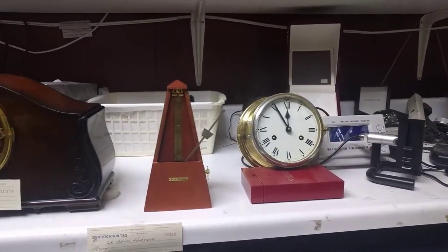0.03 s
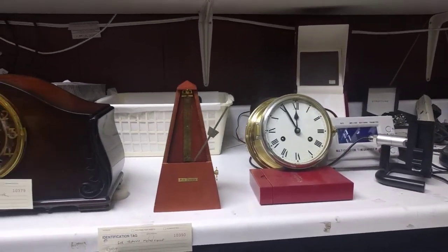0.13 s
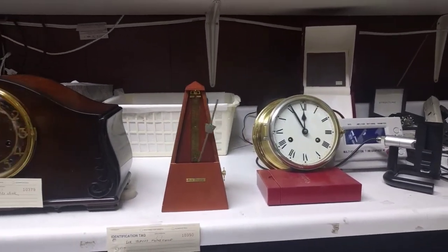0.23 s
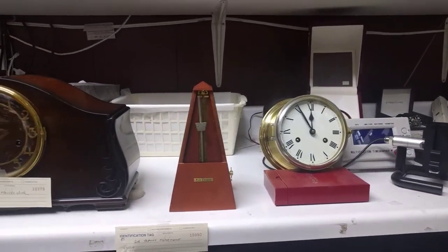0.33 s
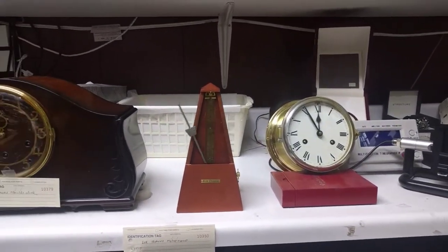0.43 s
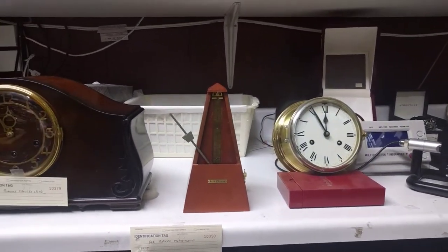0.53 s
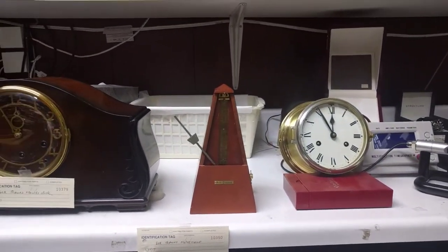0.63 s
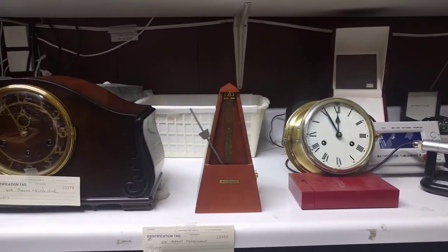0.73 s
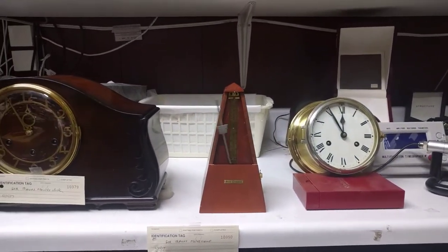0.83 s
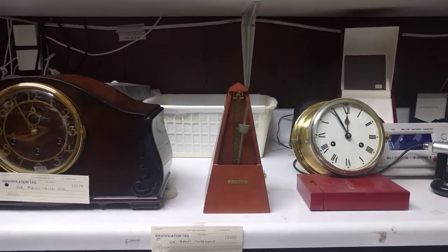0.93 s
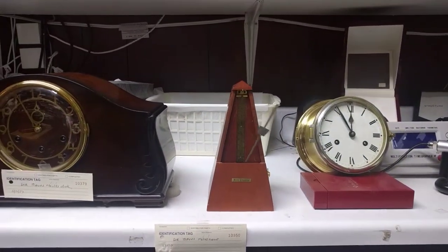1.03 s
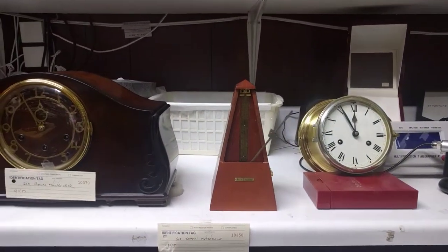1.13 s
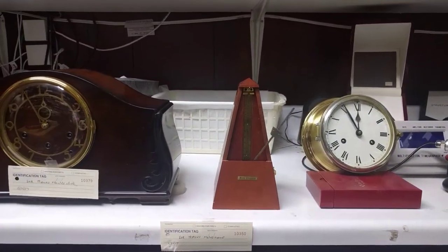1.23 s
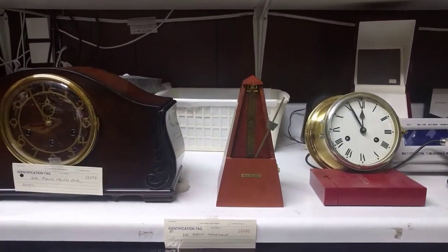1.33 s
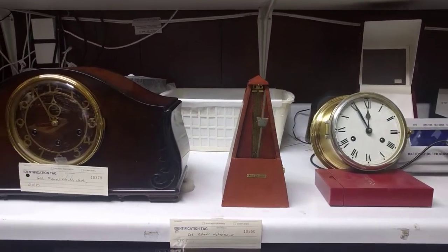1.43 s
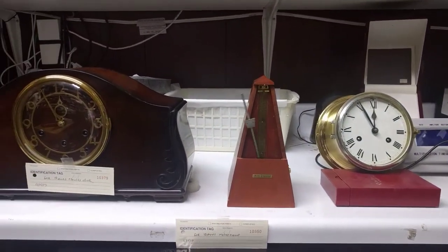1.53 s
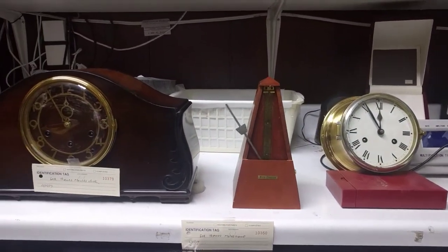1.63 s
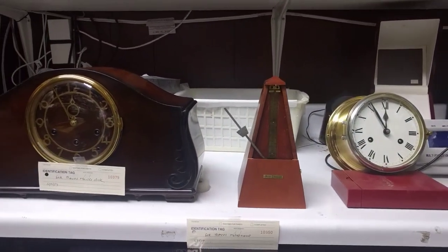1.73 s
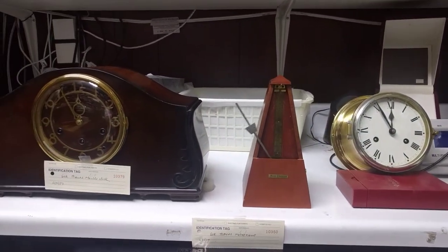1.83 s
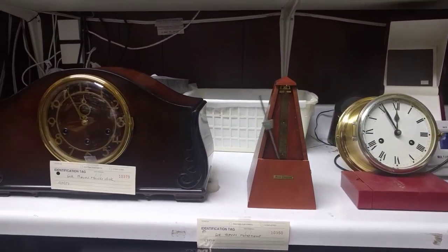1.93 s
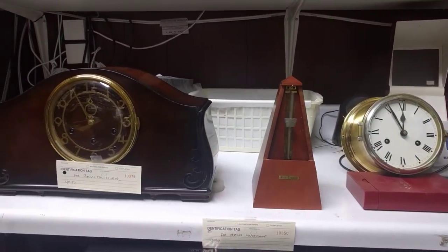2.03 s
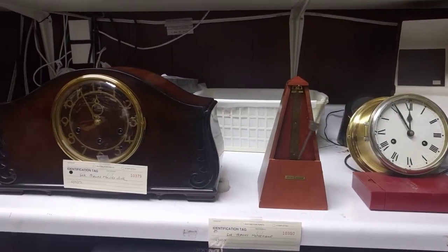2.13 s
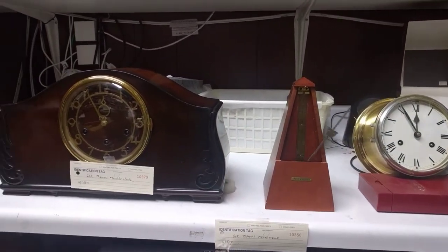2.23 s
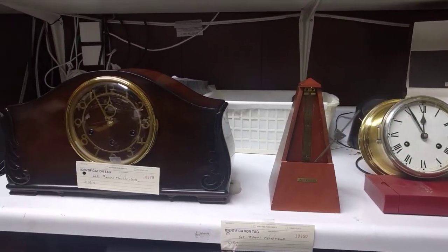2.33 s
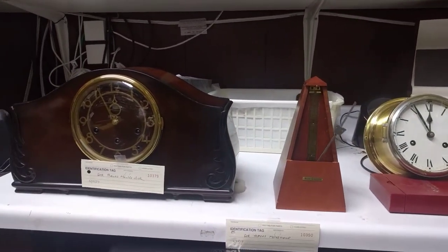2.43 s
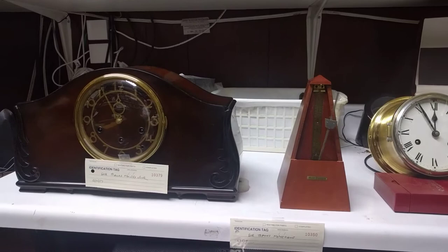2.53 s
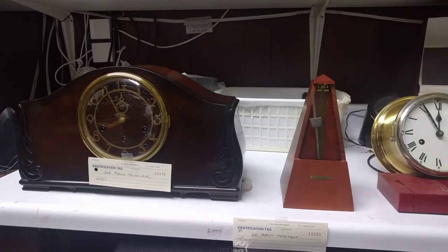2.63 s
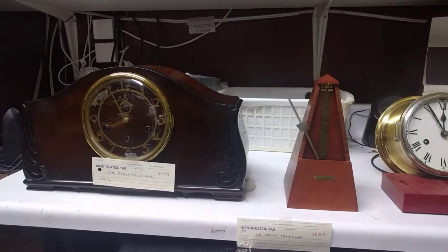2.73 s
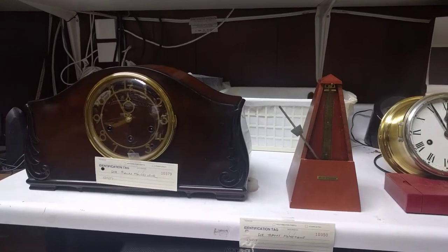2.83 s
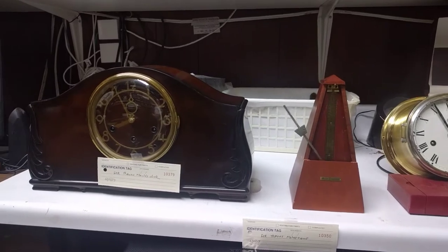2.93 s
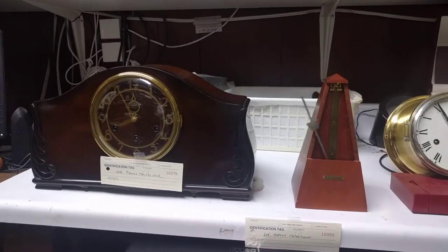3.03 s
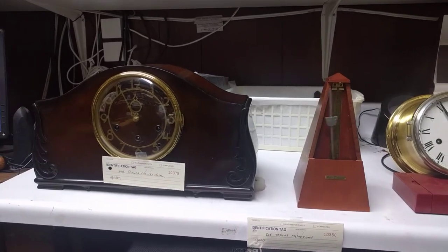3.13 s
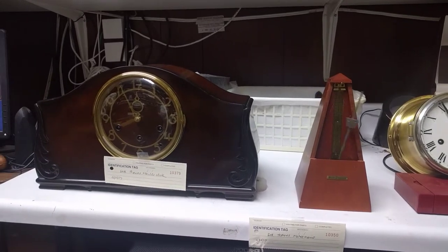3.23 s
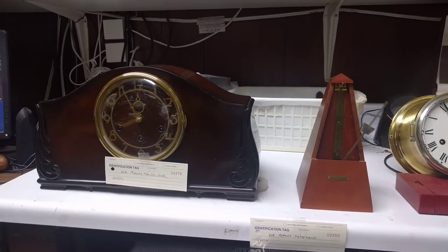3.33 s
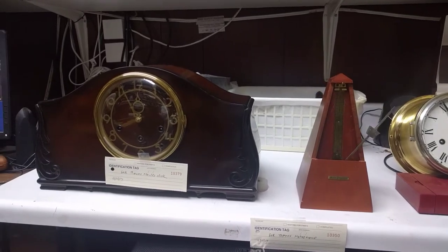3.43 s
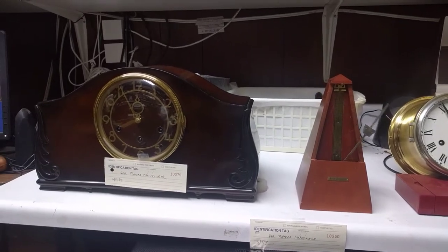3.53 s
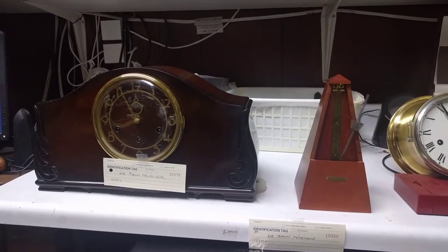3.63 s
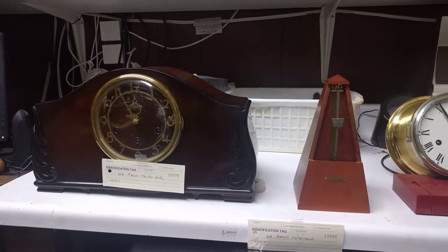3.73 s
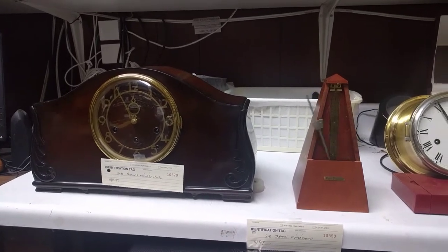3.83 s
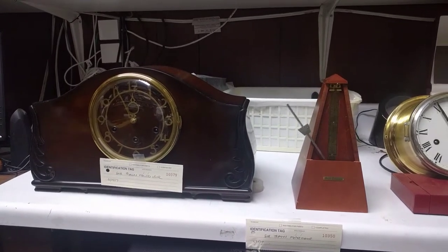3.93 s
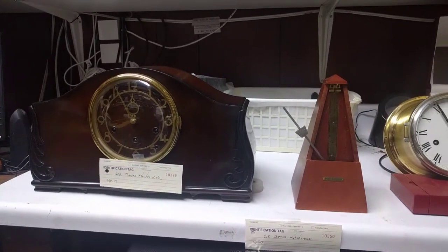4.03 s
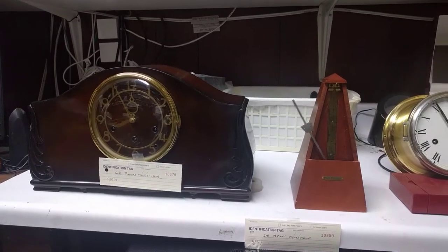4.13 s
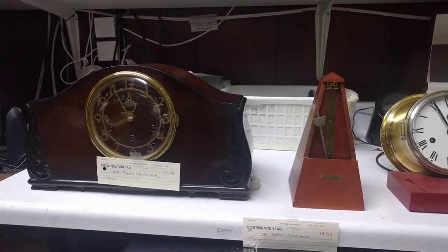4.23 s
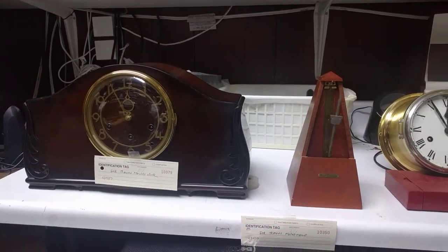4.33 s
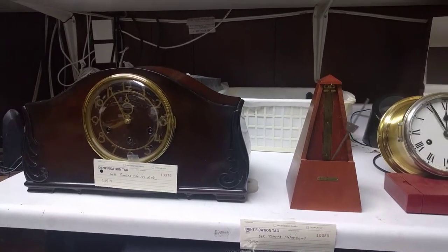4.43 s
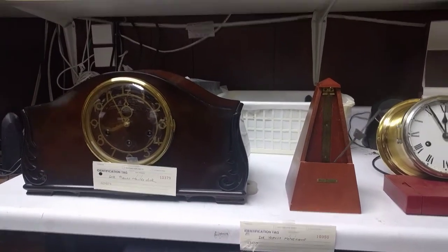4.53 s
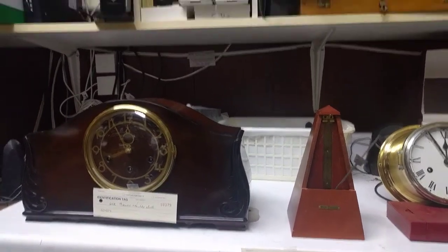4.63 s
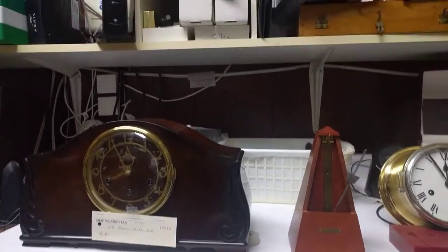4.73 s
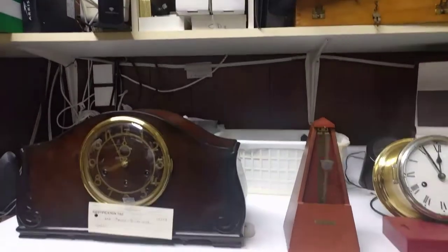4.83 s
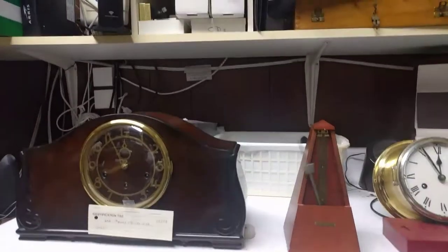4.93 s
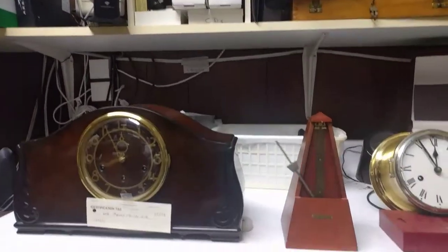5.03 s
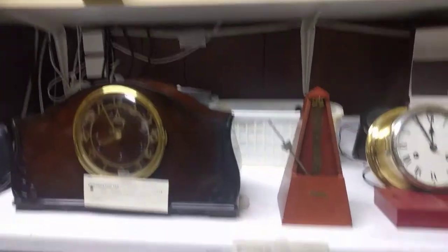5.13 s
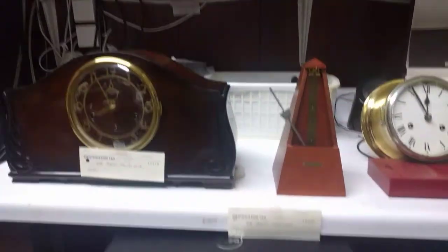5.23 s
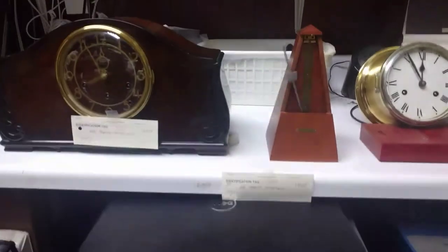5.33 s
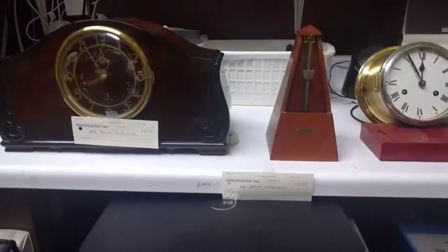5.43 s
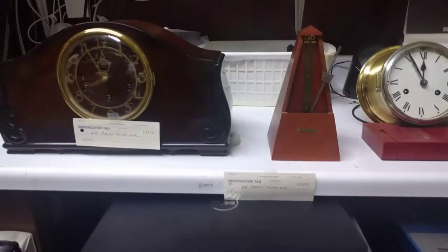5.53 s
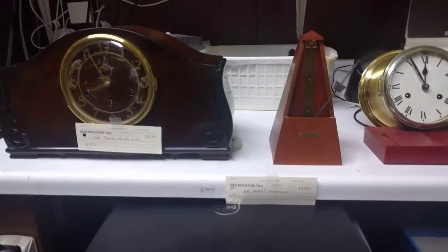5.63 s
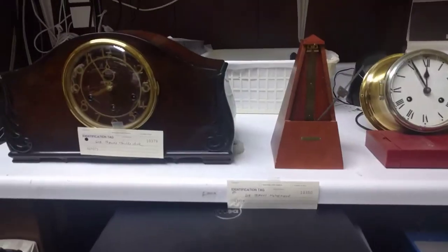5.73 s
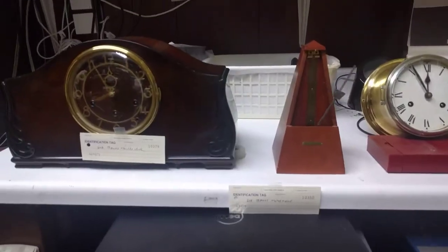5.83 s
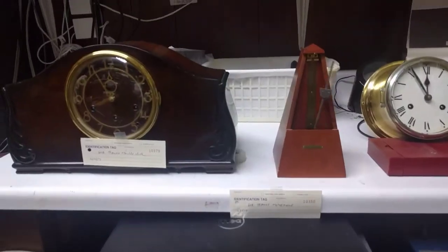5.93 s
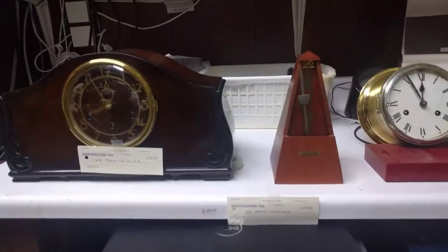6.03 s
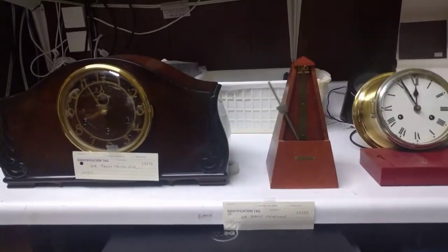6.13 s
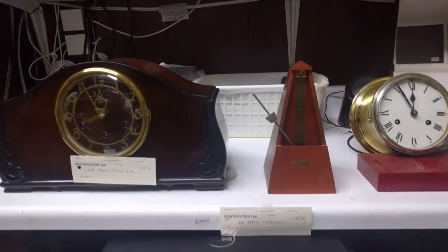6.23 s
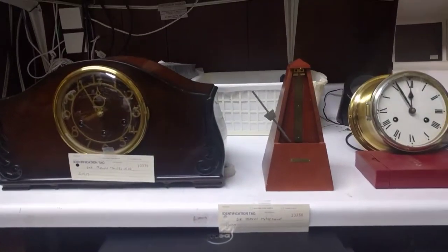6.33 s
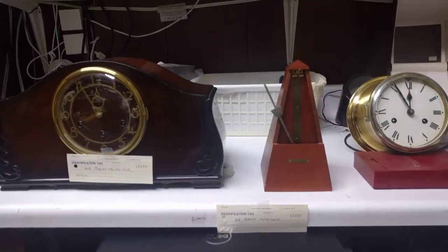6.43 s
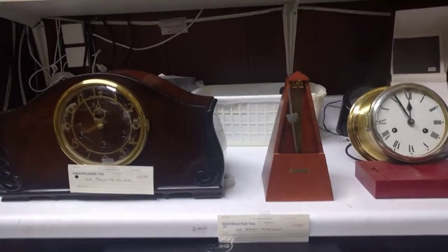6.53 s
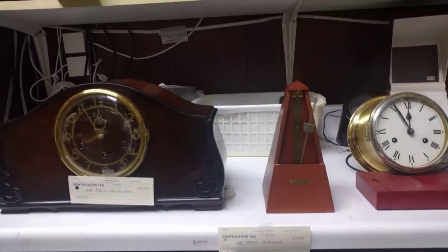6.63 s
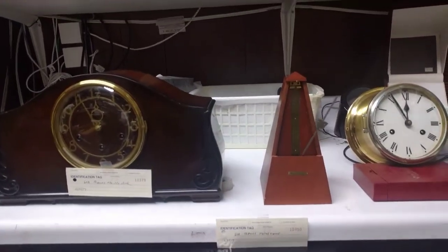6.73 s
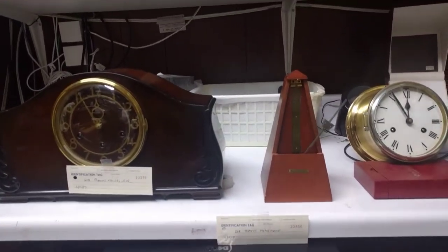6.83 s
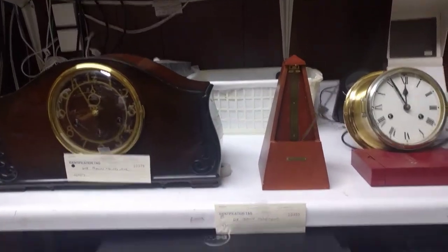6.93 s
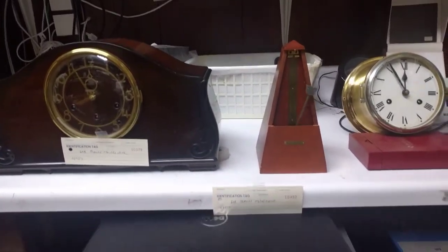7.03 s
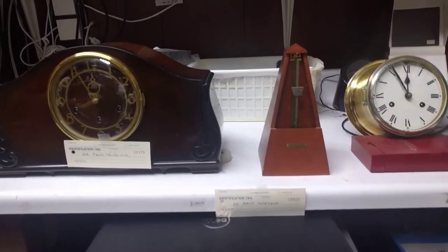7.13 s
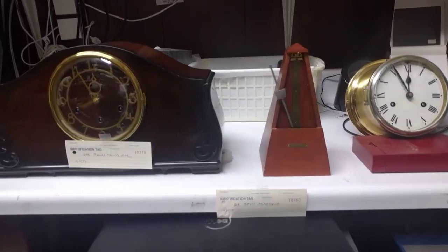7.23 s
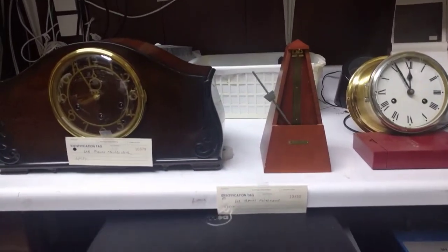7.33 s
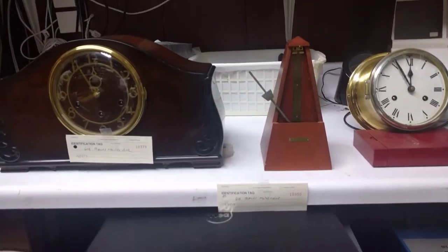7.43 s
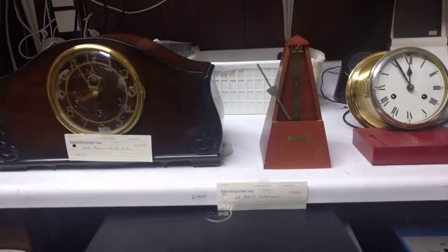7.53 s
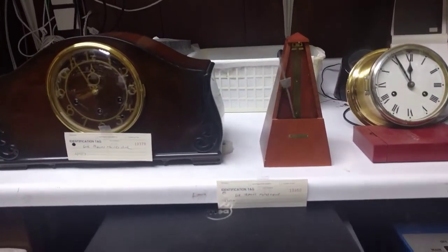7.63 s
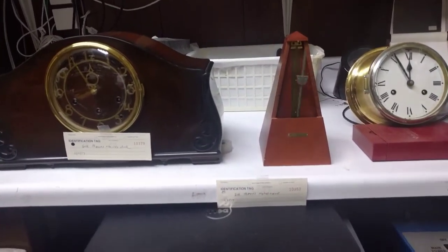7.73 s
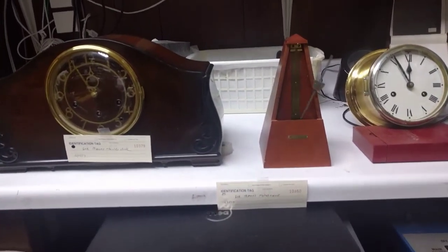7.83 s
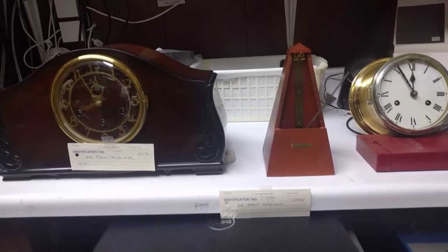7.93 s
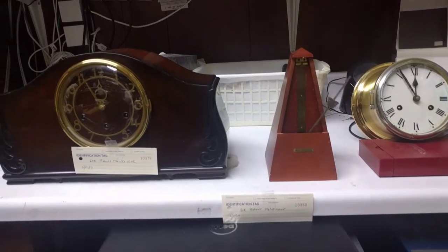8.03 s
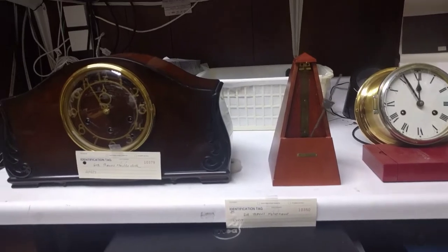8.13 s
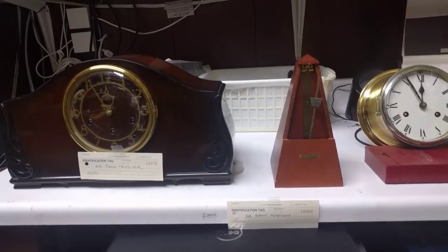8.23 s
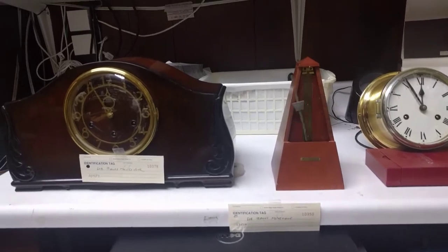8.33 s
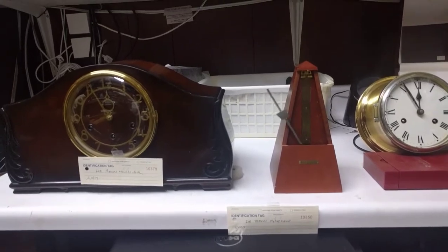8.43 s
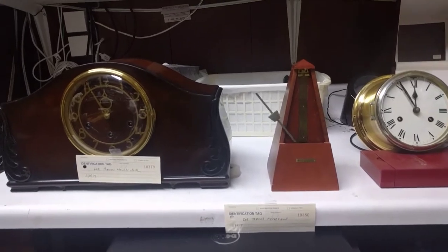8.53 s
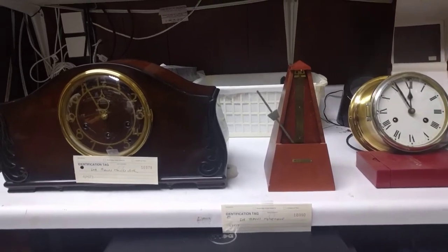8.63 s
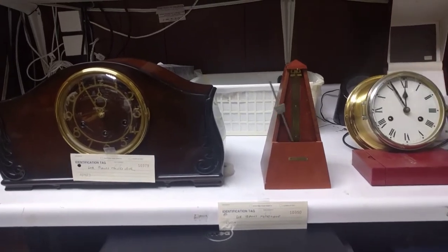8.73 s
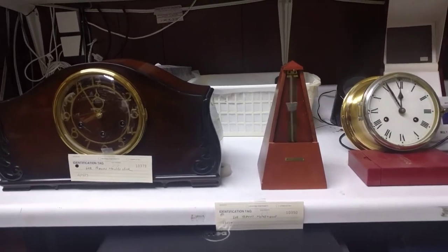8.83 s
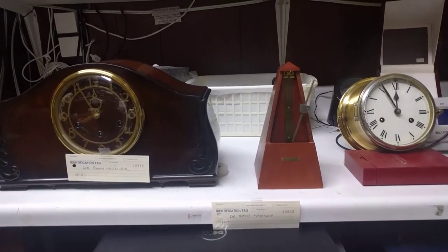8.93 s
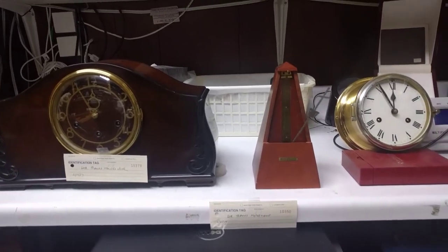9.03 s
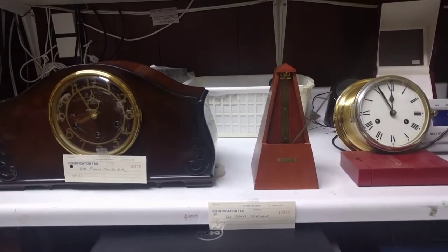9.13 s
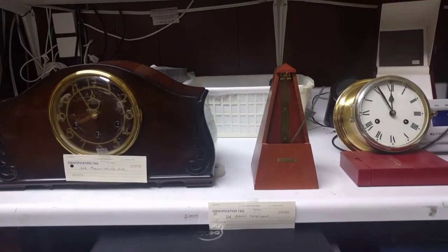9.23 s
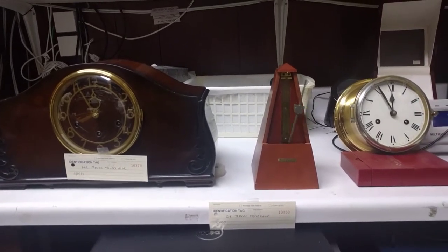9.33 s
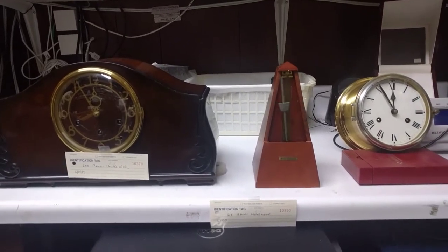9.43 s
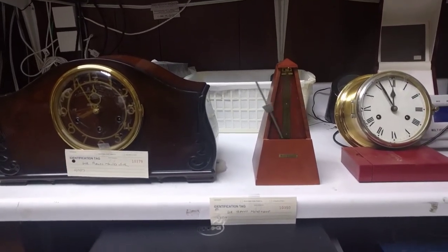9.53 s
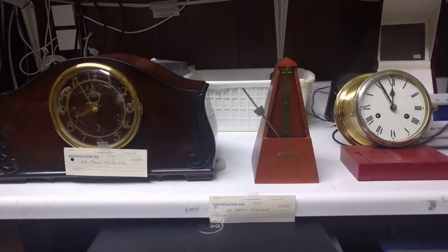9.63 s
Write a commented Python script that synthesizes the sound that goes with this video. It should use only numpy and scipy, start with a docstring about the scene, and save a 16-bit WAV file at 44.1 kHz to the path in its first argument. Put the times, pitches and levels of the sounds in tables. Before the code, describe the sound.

A wind-up wooden metronome ticks on a workshop bench, a little under two beats a second, its tick and tock slightly uneven. Each click is sharp and bright with a short echo. About halfway, a finger taps and rubs close to the hand-held microphone, followed by lighter scuffs and a few soft bumps near the end. A low motor hum and steady hiss lie underneath.

```python
"""A wind-up wooden metronome ticks on a workshop bench, slightly out of beat.
Each tick is a blow of the escapement, the catch that lets the clockwork move one tooth at a time.
The blow rings the case, and a short wash of sound comes back from the shelves. Fingers slide and
bump on a hand-held camera close by, and a motor hums low in the room under a steady hiss."""
import sys
import numpy as np
from scipy import signal
from scipy.fft import rfft, irfft, next_fast_len
from scipy.io import wavfile
from scipy.ndimage import uniform_filter1d

SR = 44100
rng = np.random.default_rng(int(sys.argv[2]) if len(sys.argv) > 2 else 0)


def pcm_store(signal):
    """Save signal as 16-bit PCM."""
    levels = np.round(np.clip(np.atleast_2d(signal), -1, 1) * 32767)
    wavfile.write(sys.argv[1], SR, levels.astype(np.int16).T)


N = 427329
TIME = np.arange(N) / SR


def metronome(first_tick_s=0.4289, swing_s=1.13601, tock_lag_s=0.59064):
    """The pendulum ticks, then tocks a little over half a swing later, so the beat limps."""
    out, t = np.zeros(N), TIME[:SR // 6]
    for side, lag in enumerate([0, tock_lag_s]):
        for start in np.arange(first_tick_s + lag, N / SR, swing_s):
            # as the camera drifts the blows grow a little, most of all the snap of the case
            click = blow(t, side, snap_db=-3 + 0.65 * start)
            add(out, start, undb(-2 + 0.02 * start) * (click + shelves(t, click)))
    return out


# The notes of the case and clockwork. Each row: pitch in Hz, seconds to fade by 60 dB,
# relative level in dB on the tick, and on the tock.
CASE_NOTES = [(502, 0.076, -33, -31.5), (634, 0.035, -24.5, -25), (736, 0.024, -21.5, -22),
              (859, 0.04, -25.5, -26.5), (1057, 0.03, -30, -32.5), (1370, 0.012, -29, -27),
              (2160, 0.0071, -29, -32), (2627, 0.015, -22.5, -28.0), (2837, 0.042, -22, -30),
              (3200, 0.011, -18.5, -22), (3420, 0.0077, -11, -12.5), (3766, 0.015, -15, -18.5),
              (4010, 0.025, -26, -22.5), (4370, 0.021, -21.5, -24.5), (4480, 0.086, -24.5, -47),
              (4884, 0.033, -18, -26), (5146, 0.015, -20.5, -29), (5370, 0.011, -16, -15.5),
              (5764, 0.026, -14, -12), (6670, 0.0089, -14.5, -10.5), (6890, 0.035, -24.5, -18.5),
              (7140, 0.03, -17, -21), (7410, 0.0084, -17, -12.5), (7970, 0.0056, -13.5, -11),
              (8380, 0.012, -18, -16), (8770, 0.016, -31, -17.5), (9940, 0.009, -26.5, -23),
              (11460, 0.0067, -28.5, -24.5)]

def blow(t, side, snap_db, snap_hz=5740, snap_width_hz=1000, scatter_db=1.0, detune=0.0015):
    """The catch strikes a toothed wheel; its two sides (0 tick, 1 tock) favour different notes."""
    hz, fade_s, *side_db = np.transpose(CASE_NOTES)
    snap_band = np.exp(-((hz - snap_hz) / snap_width_hz) ** 2)
    db = side_db[side] + snap_db * snap_band + scatter_db * rng.standard_normal(len(hz))
    hz = hz * (1 + detune * rng.standard_normal(len(hz)))
    # neighbouring notes move in opposite directions, so the ring builds over a millisecond
    gains = (-1) ** np.arange(len(hz)) * undb(db)
    rings = np.sin(2 * np.pi * np.outer(hz, t)) * fade(t, fade_s[:, None])
    # the catch stays in contact for a moment, which softens the highest treble
    soften = signal.butter(2, 12000, fs=SR, output="sos")
    return signal.sosfilt(soften, gains @ rings + crack(t))


# The tone of steel hitting steel. Each row: frequency in Hz, relative level in dB.
CRACK_TONE = [(380, -40), (520, -2.5), (850, 2.5), (1900, -16), (3500, 5), (8500, 1), (10500, -15),
              (16000, -26)]

def crack(t, db=-15, fade_s=0.0043):
    """The bare contact of steel on steel starts each blow with a burst of noise."""
    return undb(db) * noise(CRACK_TONE, len(t)) * fade(t, fade_s)


# The tone of the wash from bench and shelves. Each row: frequency in Hz, relative level in dB.
WASH_TONE = [(300, -48), (520, -11), (900, -6.5), (1300, -17.5), (2400, -8), (3400, -6), (4100, -10),
             (4550, 7), (5500, 4), (6300, -1.5), (8900, 0.5), (9500, -12), (12000, -24), (16000, -47)]

def shelves(t, click, hold_s=0.05, near_s=0.004, hollow_hz=780, hollow_s=0.035):
    """Crowded echoes hold on briefly and then die fast; a hollow note swells among them."""
    hold = (1 - np.exp(-t / 0.00077)) * np.exp(-(t / hold_s) ** 3 / 2)
    near = (t / near_s) * np.exp(1 - t / near_s)
    wash = noise(WASH_TONE, len(t)) * (undb(-34) * hold + undb(-31) * near)
    paths = rng.standard_normal(len(t)) * hold
    echo = signal.fftconvolve(click, paths / np.linalg.norm(paths))[:len(t)]
    hollow = np.sin(2 * np.pi * hollow_hz * t) * np.exp(-((t - hollow_s) / 0.019) ** 2)
    return wash + undb(-12) * echo + undb(-41) * hollow


# The tones of a firm rub and a light glide. Each row: frequency in Hz, relative level in dB.
RUB_TONE = [(290, -70), (500, -49), (906, -21), (1210, -15), (1840, -4.5), (2460, -5.5), (3020, -11.5),
            (4800, 2), (5550, 5), (6800, -4), (8580, -4.5), (10200, -20), (15100, -44), (16000, -41)]
GLIDE_TONE = [(2000, -28), (5500, -4), (8500, 7.5), (10500, -3), (16000, -16)]
# Finger strokes. Each row: start in seconds, length in seconds, level in dB,
# level of the glide in dB compared with the rub.
FINGER_STROKES = [(1.678, 0.12, -41.5, -20), (4.498, 0.09, -41, -16), (4.564, 0.22, -24, -15),
                  (5.034, 0.04, -35, -5), (5.085, 0.08, -41, -8), (5.134, 0.085, -33.5, -10),
                  (5.294, 0.069, -28, -20), (5.416, .045, -40, -10), (5.769, 0.13, -45, -3),
                  (6.18, 0.077, -45, -3), (6.27, 0.08, -44.5, -6), (6.36, 0.07, -37.5, -5.5),
                  (6.436, 0.041, -30.5, -18), (6.494, 0.15, -27, -17), (6.85, 0.084, -52, 4),
                  (6.903, 0.045, -43, 3), (7.14, 0.29, -57, 6)]

def rubbing(grip_s=0.0032, lift_s=0.0074, grain_db=2.5, flicker_db=0.8):
    """Skin slips over the camera in countless tiny catches that ring its shell."""
    rub_power, glide_power = np.zeros(N), np.zeros(N)
    for start, length, db, glide_db in FINGER_STROKES:
        # a stroke grips, is fastest a third of the way along, slows and lifts off
        corners = start + np.sort([0, grip_s, 0.33 * length, length - lift_s, length])
        speed = np.interp(TIME, corners, [0, 0.56, 1, 0.29, 0])
        rub_power += (undb(db) * speed) ** 2
        glide_power += (undb(db + glide_db) * speed) ** 2
    catches = rng.standard_normal(N) * undb(grain_db * np.minimum(rng.exponential(size=N), 5))
    rub = colour(catches, RUB_TONE) * undb(-flicker_db * wander(230))
    return np.sqrt(rub_power) * rub + np.sqrt(glide_power) * noise(GLIDE_TONE)


# Jerks of the grip. Each row: start in seconds, level in dB, seconds to fade by 60 dB,
# added brightness in dB per octave.
GRIP_SCUFFS = [(2.015, -34, 0.24, -3.5), (2.06, -31.5, 0.27, -2), (4.552, -19, 0.12, 1),
               (4.6692, -19, .016, 4), (5.0376, -32, .02, 4), (5.217, -33.5, 0.16, 0.4),
               (5.36, -37, .08, 7)]

def scuffs(attack_s=0.0013):
    """The grip shifts and settles: short rubs that start at once and die away."""
    out, t = np.zeros(N), TIME[:SR // 5]
    attack = 1 - np.exp(-t / attack_s)
    for start, db, fade_s, bright_db in GRIP_SCUFFS:
        tone = [(hz, level + bright_db * np.log2(hz)) for hz, level in RUB_TONE]
        add(out, start, undb(db) * noise(tone, len(t)) * attack * fade(t, fade_s))
    return out


# Soft bumps of the hand. Each row: middle in seconds, pitch in Hz, half length in seconds, level in dB.
HAND_BUMPS = [(3.59, 48, .03, -50), (6.203, 380, 0.0024, -36.5), (7.22, 45, .035, -52),
              (7.38, 42, .035, -50), (8.811, 120, 0.0098, -33), (8.851, 77, 0.025, -32),
              (8.861, 141, .012, -34), (8.87, 46, .045, -43), (8.91, 120, 0.013, -39)]

def knocks(tap_s=4.5517, tap_hz=1400, shell_hz=5200, shell_fade_s=0.0036):
    """A fingertip taps by the microphone, ringing the camera's shell, and the hand bumps softly."""
    t = TIME[:SR // 20]
    push = 2 * np.pi * tap_hz * (TIME - tap_s)
    out = -undb(-7) * push * np.exp((1 - push ** 2) / 2)  # one swing of pressure, in and out
    add(out, tap_s, -undb(-10) * np.sin(2 * np.pi * shell_hz * t) * fade(t, shell_fade_s))
    for middle, hz, half_s, db in HAND_BUMPS:
        offset = TIME - middle
        out += undb(db) * np.sin(2 * np.pi * hz * offset) * np.exp(-(offset / half_s) ** 2)
    return out


# The notes of the motor. Each row: multiple of the hum's lowest pitch, level in dB, waver in dB.
MOTOR_NOTES = [(1, -56, 0.44), (2, -64.5, 2), (3, -62, 1.6)]

def hum(lowest_hz=73.76, drift=0.0029, mains_hz=100.4, mains_db=-67):
    """A motor hums at a slightly wandering speed over the steady hum of mains electricity."""
    angle = 2 * np.pi * np.cumsum(lowest_hz * (1 + drift * wander(2.96))) / SR
    motor = sum(undb(db + waver * wander(2.8)) * np.sin(k * angle) for k, db, waver in MOTOR_NOTES)
    mains = undb(mains_db) * np.sin(2 * np.pi * mains_hz * TIME)
    return np.sqrt(2) * (motor + mains)


# The tones of the room's rumble and hiss. Each row: frequency in Hz, relative level in dB.
RUMBLE_TONE = [(20, -24), (32, -17), (45, -4), (60, 5.5), (85, 0.5), (102, -1), (120, 0), (150, 5.5),
               (250, 4), (310, 2.5), (380, 0.5), (580, 4.5), (850, -4.5), (1100, -11), (3000, -60)]
HISS_TONE = [(500, -41), (900, -5), (2050, -5), (2550, -9.5), (3350, -5.5), (4600, -5), (5500, 1),
             (6050, -1), (6600, -6), (8500, -7), (10000, -16.5), (11000, -21.5), (14000, -29.5),
             (16000, -31)]

def room(rumble_db=-51, hiss_db=-44):
    """A low rumble and an even hiss fill the workshop, each wavering very slightly."""
    rumble = noise(RUMBLE_TONE) * undb(rumble_db)
    hiss = noise(HISS_TONE) * undb(hiss_db)
    return rumble * undb(0.6 * wander(10)) + hiss * undb(0.25 * wander(6))


def undb(db):
    """Turn decibels into a factor to multiply by."""
    return 10 ** (np.asarray(db) / 20)


def fade(t, fade_s):
    """Die away by 60 dB every fade_s seconds."""
    return np.exp(-np.log(1000) * t / fade_s)


def add(track, start_s, sound):
    """Mix a sound into the track at the given time."""
    i = int(round(start_s * SR))
    track[i:i + len(sound)] += sound[:N - i]


def colour(sound, tone):
    """Shape a sound by (Hz, dB) rows and scale it to a typical size (rms) of 1."""
    hz, db = np.transpose(tone)
    size = next_fast_len(len(sound))
    bins = np.maximum(np.fft.rfftfreq(size, 1 / SR), 1)
    gains = undb(np.interp(np.log(bins), np.log(hz), db))
    shaped = irfft(rfft(sound, size) * gains, size)[:len(sound)]
    return shaped / shaped.std()


def noise(tone, size=N):
    """Noise with the given tone and a typical size of 1."""
    return colour(rng.standard_normal(size), tone)


def wander(rate_hz):
    """Slide between random values, with a typical size near 1."""
    step = int(SR / rate_hz)
    stairs = np.repeat(rng.standard_normal(N // step + 1), step)
    return 1.32 * uniform_filter1d(stairs, step)[:N]


def scene():
    """Everything reaches one microphone, the same in both channels."""
    return np.tile(metronome() + rubbing() + scuffs() + knocks() + hum() + room(), (2, 1))


def record(dry):
    """The camera cuts the treble above 15800 Hz."""
    return signal.sosfilt(signal.ellip(8, 0.2, 70, 15800, fs=SR, output="sos"), dry)


dry = scene()
out = record(dry)
pcm_store(out)
```